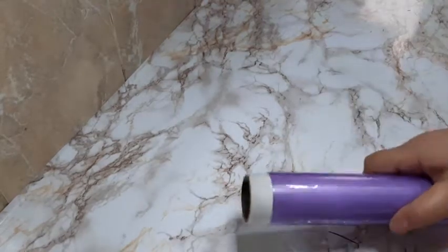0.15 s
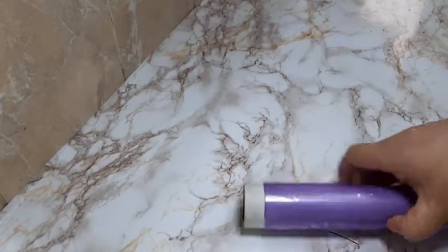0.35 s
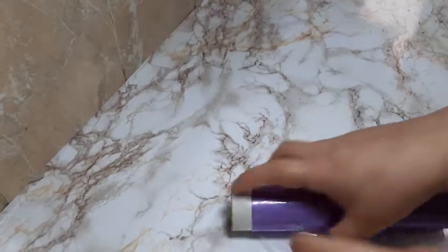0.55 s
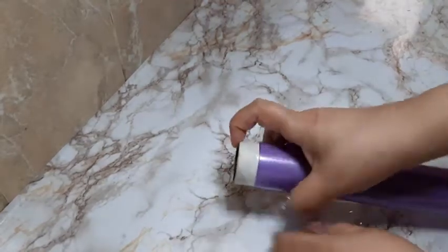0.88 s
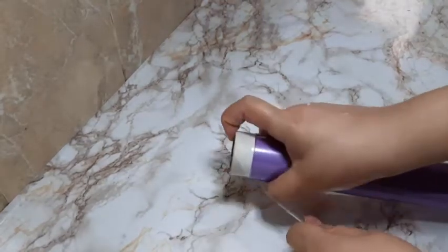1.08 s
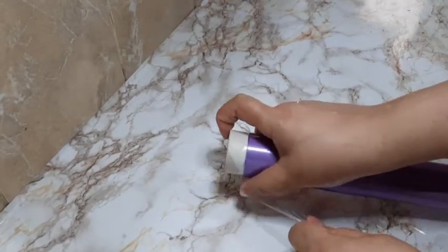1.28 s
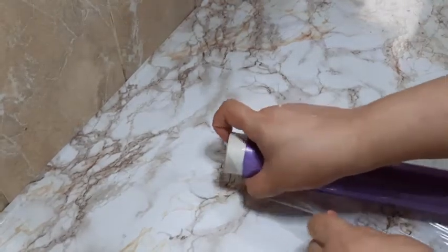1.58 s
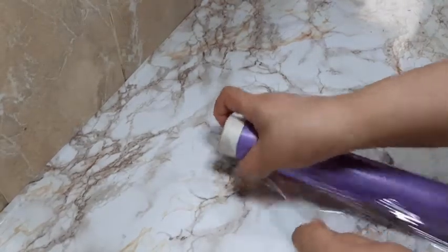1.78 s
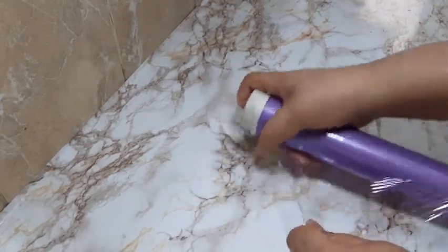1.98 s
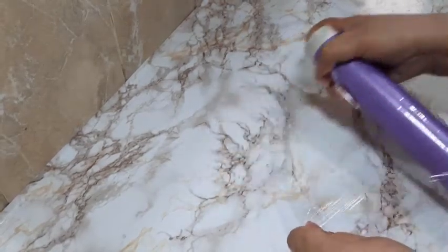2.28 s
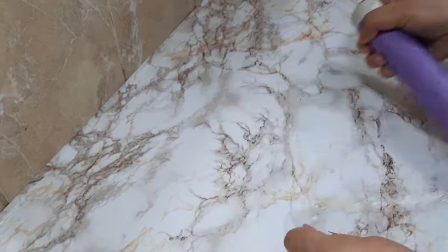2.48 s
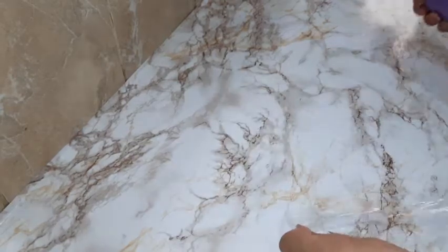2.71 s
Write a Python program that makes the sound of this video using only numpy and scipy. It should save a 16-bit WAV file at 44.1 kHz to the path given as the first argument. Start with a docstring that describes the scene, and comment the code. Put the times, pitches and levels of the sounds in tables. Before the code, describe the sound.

Cling film on its cardboard roll, handled close up in a small hard kitchen. Slight crinkle at the start, soft low bumps from 0.1 s, a sharp knock at 0.35 s with a brief crinkle. Delicate picking and ticks from 0.6 to 1.3 s, crisp snaps near 1.5, 1.77 and 1.97 s. From 2.1 to 2.6 s film peels in loud, jerky, hollow creaking bursts with low rumble, then near-quiet, faint hiss and a tiny tick at 2.73 s.

```python
"""In a small, hard kitchen, close by, a roll of cling film is set down on a counter: soft bumps, a sharp knock.
Each impact is a noise clack plus decaying sine modes. The film crinkles in random clicks, shaken by the knock
or picked at its edge by fingers, and short noise bursts snap and ring. A length peels off in a dense run of
slips and jerks that excite resonances of the cardboard tube, with creaks and a low rumble. Diffuse noise
responses form the room, and faint hiss lies beneath."""
import sys
import numpy as np
from scipy import signal
from scipy.fft import rfft, irfft
from scipy.io import wavfile

SR = 44100
rng = np.random.default_rng(int(sys.argv[2]) if len(sys.argv) > 2 else 0)


def inscribe(sig):
    """Save sig as 16-bit PCM at rate SR to the path in sys.argv[1].

    A 1-D sig is mono; a 2-D sig holds one channel per row.
    Samples are clipped to [-1, 1] before scaling.
    """
    pcm = np.round(np.clip(np.atleast_2d(sig).T, -1, 1) * 32767)
    wavfile.write(sys.argv[1], SR, pcm.astype(np.int16))


N = 125685
TIME = np.arange(N) / SR

# Levels in the tables are relative: the gains below and in the functions add to them.
# spectrum of the background hiss: [f/Hz, level/dB]
HISS_SPECTRUM = [(30, -2.5), (100, 7.5), (300, -10.5), (16000, -16)]
HISS_DB = -68.5
# room acoustics: [f/Hz, decay time t60/s, reverberation level/dB, near reflection level/dB, left-right correlation]
ROOM_BANDS = [(100, 1, -19, -35.5, 0.41), (342.6, 0.25, 1, -3.5, 0.96), (1300, 0.27, 1, 1, -0.14),
              (5000, 0.25, -2, 1.5, 0.19), (15000, 0.26, -11.5, -4, 0.89)]
# level of the left channel relative to the right: [f/Hz, level/dB]
LEFT_BALANCE = [(120, 1), (330, -2), (650, 1.5), (1400, 1.5), (4000, 1)]
NEAR_T60_S, LAG_SPREAD_S, PLACE_HOLD_S = 0.025, .00008, .012

# rumble of the turning roll on the counter: [t/s, level/dB]
RUMBLE_LEVEL = [(2.08, -76), (2.125, -39), (2.19, -39), (2.25, -48), (2.295, -31), (2.35, -61),
                (2.4, -38.5), (2.62, -65)]
RUMBLE_HZ, RUMBLE_WIDTH_HZ = 94, 74

# impacts of roll on counter: [t/s, level/dB, contact brightness f/Hz, clack level/dB]
IMPACTS = [(0.118, -10.5, 240, -45.5), (0.1916, -10, 207, -52), (0.2415, -13.5, 273, -46.5),
           (0.2858, -18.5, 550, -18), (0.3148, -13, 500, -29), (0.3464, -0.5, 4000, -3.5),
           (0.3756, -8, 1510, -10.5), (0.449, -13.5, 150, -52)]
# joint modes of counter and roll: [f/Hz, level/dB]
COUNTER_MODES = [(88, -10.5), (101, -11), (180, -19), (240, -22), (329, -15), (368, -17), (441, -27),
                 (565, -24), (610, -22), (759, -29.5), (1814, -24.5), (2361, -27), (2772, -28)]
# spectrum of the hard clack: [f/Hz, level/dB]
CLACK_SPECTRUM = [(60, -6.5), (190, 10), (400, 2), (900, 5), (1170, -2), (1600, 1.5), (2800, -1),
                  (4100, -7), (6500, -5.5), (9800, -15.5), (16000, -13.5)]
CLACK_DB, CLACK_T60_S, RING_DB = 21, 0.026, -2
BOOM_T60_S, COUNTER_T60_S, BOOM_BELOW_HZ = 0.29, 0.16, 120.5
HAND_DAMPING_DB_PER_S = 243.5  # upper limit, approached by the softest bumps, when the hand still holds the roll

# creaks where the film catches: [t/s, f/Hz, level/dB]
CATCHES = [(0.001, 849, -14.5), (2.101, 582, -7.5), (2.099, 2500, -1), (2.172, 590, -8), (2.267, 1360, -3),
           (2.388, 1286, -0.5), (2.429, 1300, -1.5), (2.467, 810, -7.5), (2.486, 598, -7)]
CREAK_T60_S, CREAK_WIDTH_SHARE = 0.0463, .17  # bandwidth as a share of f

# level of the film's crinkling, shaken by the knock or picked by the fingers: [t/s, level/dB]
CRINKLE_LEVEL = [(0, -44), (.06, -59), (.28, -60.5), (.38, -38.5), (.56, -73), (.75, -54), (.97, -59),
                 (1.04, -51.5), (1.09, -60.5), (1.16, -52.5), (1.38, -89), (1.58, -61), (1.68, -57),
                 (1.81, -49), (1.9, -53.5), (1.942, -44), (1.99, -67), (2.85, -65)]
CRINKLES_PER_S, CRINKLE_SPREAD_DB = 400, 4
# stuck film snapping free: [t/s, level/dB, ring f/Hz, tube body level/dB]
FILM_SNAPS = [(0.6038, -46.5, 8930, -20), (0.726, -39, 2400, -15), (0.783, -38.5, 2350, -15),
              (0.9198, -28, 5460, -38), (0.9304, -37, 5450, -10), (0.9813, -35.5, 1300, -28),
              (1.0173, -31.5, 5980, -16.5), (1.052, -32.5, 2420, -23), (1.1141, -32.5, 5580, -25),
              (1.1757, -21, 2490, -30), (1.226, -34, 2650, -24), (1.2831, -18.5, 1440, -18.5),
              (1.485, -9, 6320, 0), (1.767, -16.5, 5830, -2), (1.8879, -43, 6000, 4),
              (1.9418, -25, 1370, 7), (1.967, -9.5, 2090, -8.5), (2.0534, -28.5, 5860, -26),
              (2.7304, -35, 1300, -9)]
SNAP_DB, SNAP_T60_S = 9, 0.0027
# radiation spectrum of the crinkling and snapping film: [f/Hz, level/dB]
FILM_SPECTRUM = [(150, -22.5), (600, -21), (1250, 0), (2400, -1.5), (3800, -2), (5600, 0.5), (8400, 1),
                 (9700, -7), (12500, 2), (16000, -3.5)]
# spectrum of the tube body shaken by a snap: [f/Hz, level/dB]
SNAP_BODY_SPECTRUM = [(200, -5.5), (280, 3), (345, 12.5), (480, 3), (1800, -1), (4000, -6)]

# shifts of the grip on the roll: [start t/s, end t/s, level/dB]
GRIP_SHIFTS = [(0, 0.017, -41.5), (0.677, 0.87, -63), (1.674, 1.86, -60), (1.926, 1.978, -47.5)]
RUB_FADE_S = .03

# level of the film peeling off the roll: [t/s, level/dB]
PEEL_LEVEL = [(2.081, -46), (2.085, -36.5), (2.095, -32), (2.102, -27), (2.13, -31.5), (2.203, -27),
              (2.27, -25.5), (2.3, -37.5), (2.354, -29.5), (2.376, -54), (2.393, -28), (2.42, -35),
              (2.442, -22.5), (2.476, -22.5), (2.515, -28), (2.578, -28), (2.595, -58), (2.66, -74)]
SLIPS_PER_S, SLIP_SPREAD_DB = 1400, 4.2
# larger patches letting go at once: [t/s, level/dB]
PATCH_JERKS = [(2.1035, -2.5), (2.1187, -1.5), (2.268, 1), (2.2747, -0.5), (2.389, 7.5), (2.391, 1.5),
               (2.4035, 1.5), (2.427, 3), (2.4359, 2), (2.502, -5.5)]
JERK_T60_S = .0015
# radiation spectrum of the peeling film: [f/Hz, level/dB]
PEEL_SPECTRUM = [(60, -22.5), (230, 0.5), (450, 6), (1000, 6), (1900, 4), (4000, -0.5), (5500, 2),
                 (8400, 4), (9700, -1.5), (13000, 2.5)]
# resonances of the cardboard tube: [f/Hz, bandwidth/Hz, level/dB]
TUBE_MODES = [(590, 31, 4.5), (788, 120, 5), (1165, 54, 3.5), (1290, 130, 9), (1748, 120, 6)]
TUBE_WANDER_SHARE, TUBE_WANDERS_PER_S = .025, 18


def from_db(db):
    """Logarithmic level: decibels converted to amplitude gain."""
    return 10 ** (np.asarray(db) / 20)


def rms_one(x):
    """Power normalization: scale to unit mean square."""
    return x / np.sqrt(np.mean(x ** 2) + 1e-20)


def in_time(rows):
    """Level envelope: interpolate each column over time, at -120 dB outside the curve."""
    t, *columns = np.transpose(rows)
    return [np.interp(TIME, t, column, left=-120, right=-120) for column in columns]


def at_hz(rows, hz):
    """Frequency response: interpolate each column over logarithmic frequency."""
    f, *columns = np.transpose(rows)
    return [np.interp(np.log(np.maximum(hz, 1)), np.log(f), column) for column in columns]


def colour(x, spectrum, size=8192):
    """Minimum-phase filtering: fold the cepstrum to obtain a causal response of given magnitude."""
    hz = np.arange(size // 2 + 1) * SR / size
    gain = from_db(at_hz(spectrum, hz)[0])
    cepstrum = irfft(np.log(gain))
    cepstrum[1:size // 2] *= 2
    cepstrum[size // 2 + 1:] = 0
    response = irfft(np.exp(rfft(cepstrum)))
    return signal.fftconvolve(x, response)[:N]


def resonate(x, hz, width_hz):
    """Damped resonance: a two-pole filter of about unit gain at its peak."""
    r = np.exp(-np.pi * width_hz / SR)
    zeros = np.array([1, 0, -1]) * (1 - r * r) / 2
    poles = [1, -2 * r * np.cos(2 * np.pi * hz / SR), r * r]
    return signal.lfilter(zeros, poles, x + 1e-18)


def burst(s, t60, size=2048, count=6):
    """Impulsive excitation: fast-dying noise at time s, of nearly even spectrum and unit energy."""
    fade = from_db(-60 * TIME[:size] / t60)
    flurry = rng.standard_normal(size) * fade
    # alternately flatten the spectrum and restore the decay
    for _ in range(count):
        spectrum = rfft(flurry)
        flat = irfft(spectrum / (abs(spectrum) + 1e-12))
        flurry = flat * np.minimum(1, 10 * fade)
    return np.pad(flurry / np.linalg.norm(flurry), (int(s * SR), N))[:N]


def crackle(per_s, spread_db):
    """Random impulse process: clicks, many small and a few large, of unit power."""
    sizes = from_db(spread_db * np.minimum(rng.exponential(1, N), 4))
    clicks = sizes * rng.choice([-1, 1], N)
    return rms_one(clicks * (rng.random(N) < per_s / SR))


def wander(per_s, count=256):
    """Random modulation: straight lines between random values of about unit spread."""
    return np.interp(TIME * per_s, np.arange(count), rng.standard_normal(count))


def diffuse(size):
    """Diffuse field: spectrum of stereo noise with the room's correlation by band, and its frequencies."""
    hz = np.arange(size // 2 + 1) * SR / size
    mid, side = rfft(rng.standard_normal((2, size)))
    alike = np.clip(at_hz(ROOM_BANDS, hz)[3], -1, 1)
    common = np.sqrt(1 + alike) * mid
    opposed = np.sqrt(1 - alike) * side * [[1], [-1]]
    return (common + opposed) / np.sqrt(2), hz


def dying(t60, delay_s, size):
    """Exponential decay: a delayed envelope of unit energy."""
    fade = from_db(-60 * TIME[:size] / t60) * (TIME[:size] > delay_s)
    return fade / np.linalg.norm(fade)


def room_hiss():
    """Stationary noise: independent coloured hiss in the two channels."""
    noise = [rms_one(colour(white, HISS_SPECTRUM)) for white in rng.standard_normal((2, N))]
    return from_db(HISS_DB) * np.array(noise)


def kitchen(x, size=32768):
    """Reverberation: diffuse sound decays at its own rate in each band, with little bass."""
    (noise, hz), response = diffuse(size), 0
    centres = np.array(ROOM_BANDS)[:, 0]
    for share, (_, t60, tail_db, _, _) in zip(np.eye(len(ROOM_BANDS)), ROOM_BANDS):
        band = irfft(noise * at_hz(np.c_[centres, share], hz)[0])
        response = response + from_db(tail_db) * band * dying(t60, .005, size)
    bass_cut = signal.butter(2, 2 * BOOM_BELOW_HZ, "high", fs=SR, output="sos")
    response = signal.sosfilt(bass_cut, response)
    return signal.fftconvolve(x[None], response, axes=1)[:, :N]


def along_the_roll(x, count=12, size=4096):
    """Arrival-time difference and scattering: sound moves among places, each with its lag and reflections."""
    steps = np.arange(N) / (PLACE_HOLD_S * SR)
    visits, out = rng.integers(0, count, N)[:int(steps[-1]) + 2], 0
    for place, bearing in enumerate(np.linspace(-1, 1, count)):
        noise, hz = diffuse(size)
        scatter = irfft(noise * from_db(at_hz(ROOM_BANDS, hz)[2]))
        response = scatter * dying(NEAR_T60_S, .0005, size)
        lag = round(bearing * LAG_SPREAD_S * SR)
        response[[0, 1], [max(lag, 0), max(-lag, 0)]] += 1  # direct sound
        here = np.interp(steps, np.arange(len(visits)), 1. * (visits == place))
        gate = np.clip(.5 + 10 * (here - .5), 0, 1)  # brief crossfade between places
        out = out + signal.oaconvolve((x * gate)[None], response, axes=1)[:, :N]
    return out


def rumble():
    """Resonant response to random impulses: the turning roll judders against the counter."""
    judder = crackle(600, 2.8)
    for _ in range(2):
        judder = resonate(judder, RUMBLE_HZ, RUMBLE_WIDTH_HZ)
    return from_db(in_time(RUMBLE_LEVEL)[0]) * rms_one(judder)


def roll_on_counter(low_hz=50):
    """Modal impact: blows clack and ring the counter; soft contact favours low modes, the lowest two beating."""
    out, clacks = np.zeros(N), np.zeros(N)
    for s, db, bright_hz, clack_db in IMPACTS:
        start, t, ring = int(s * SR), TIME[:SR // 2], 0
        held = max(1 - from_db(db), 0)  # the softer the blow, the more the hand damps it
        for k, (hz, mode_db) in enumerate(COUNTER_MODES):
            t60 = BOOM_T60_S if hz < BOOM_BELOW_HZ else COUNTER_T60_S
            decay_db = mode_db - 60 * t / t60 - HAND_DAMPING_DB_PER_S * held * t
            polarity = 1 if k else -1
            ring = ring + polarity * np.sin(2 * np.pi * hz * t) * from_db(decay_db)
        contact = signal.butter(3, bright_hz, fs=SR, output="sos")
        out[start:start + len(t)] += from_db(RING_DB + db) * signal.sosfilt(contact, ring)
        clacks += from_db(CLACK_DB + db + clack_db) * burst(s, CLACK_T60_S)
    bass_cut = signal.butter(2, low_hz, "high", fs=SR, output="sos")
    return signal.sosfilt(bass_cut, out + colour(clacks, CLACK_SPECTRUM))


def creaking():
    """Stick-slip resonance: where the film catches, a short run of slips rings at one frequency."""
    out = 0
    for s, hz, db in CATCHES:
        ring = burst(s, CREAK_T60_S)
        for _ in range(2):
            ring = resonate(ring, hz, CREAK_WIDTH_SHARE * hz)
        out = out + from_db(db) * ring / np.linalg.norm(ring)
    return out


def crinkling_and_snapping(ring_width_share=0.13, ring_db=10, ring_loss_db_per_octave=5.0):
    """Sudden release of tension: film crinkles and snaps, lower rings being louder, and shakes the tube."""
    crinkle_db, = in_time(CRINKLE_LEVEL)
    film, body = from_db(crinkle_db) * crackle(CRINKLES_PER_S, CRINKLE_SPREAD_DB), 0
    for s, db, hz, body_db in FILM_SNAPS:
        snap = from_db(SNAP_DB + db) * burst(s, SNAP_T60_S)
        octaves = np.log2(hz / 1000)
        ring_gain = from_db(ring_db - ring_loss_db_per_octave * octaves)
        film = film + snap + ring_gain * resonate(snap, hz, ring_width_share * hz)
        body = body + from_db(body_db) * snap
    return colour(film, FILM_SPECTRUM) + colour(body, SNAP_BODY_SPECTRUM)


def rubbing(fade_db=19):
    """Sliding friction: the shifting grip drags film over the tube in fainter slips."""
    out = 0
    for a, b, db in GRIP_SHIFTS:
        edge_db = db - fade_db
        curve = [(a - RUB_FADE_S, edge_db), (a, db), (b, db), (b + RUB_FADE_S, edge_db)]
        out = out + peeling(curve, [])
    return out


def peeling(curve, jerks):
    """Stick-slip excitation: slips and jerks sound from film and tube, whose resonances waver as it turns."""
    level_db, = in_time(curve)
    slips = from_db(level_db) * crackle(SLIPS_PER_S, SLIP_SPREAD_DB)
    slips = slips + sum(from_db(db) * burst(s, JERK_T60_S) for s, db in jerks)
    out = colour(slips, PEEL_SPECTRUM)
    for hz, width_hz, db in TUBE_MODES:
        # bending time wavers the pitch
        bent_time = TIME + TUBE_WANDER_SHARE / TUBE_WANDERS_PER_S * wander(TUBE_WANDERS_PER_S)
        out = out + from_db(db) * np.interp(bent_time, TIME, resonate(slips, hz, width_hz))
    return out


def scene(peel_db=-3):
    """Superposition: all sources share the roll's place in the room, over faint hiss."""
    film_slips = from_db(peel_db) * (rubbing() + peeling(PEEL_LEVEL, PATCH_JERKS))
    roll = rumble() + roll_on_counter() + creaking() + crinkling_and_snapping() + film_slips
    left, right = along_the_roll(roll) + kitchen(roll)
    return np.array([colour(left, LEFT_BALANCE), right]) + room_hiss()


def record(dry):
    """Band limitation and saturation: deep bass is lost, peaks are rounded and the top is cut."""
    bass_cut = signal.butter(2, 40, "high", fs=SR, output="sos")
    top_cut = signal.ellip(10, .2, 80, 15900, fs=SR, output="sos")
    return signal.sosfilt(top_cut, np.tanh(signal.sosfilt(bass_cut, dry)))


dry = scene()
out = record(dry)
inscribe(out)
```